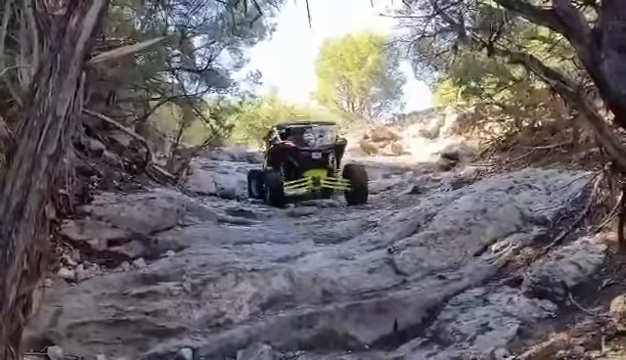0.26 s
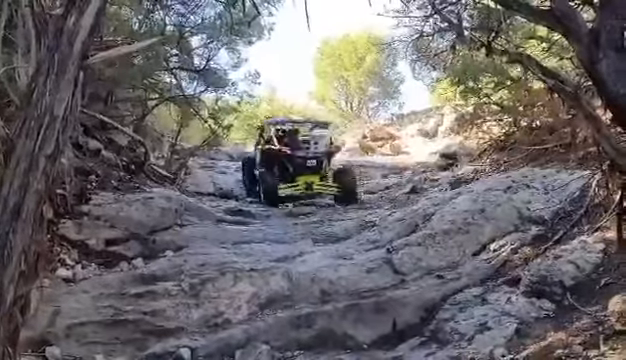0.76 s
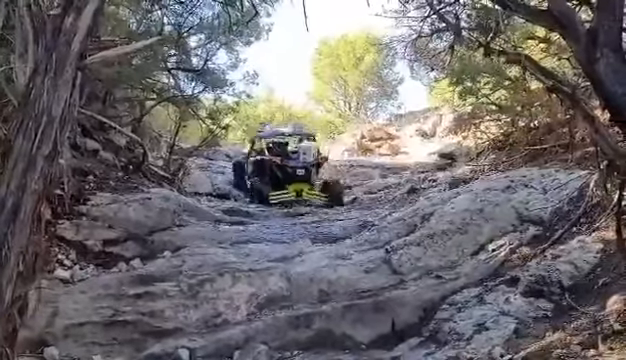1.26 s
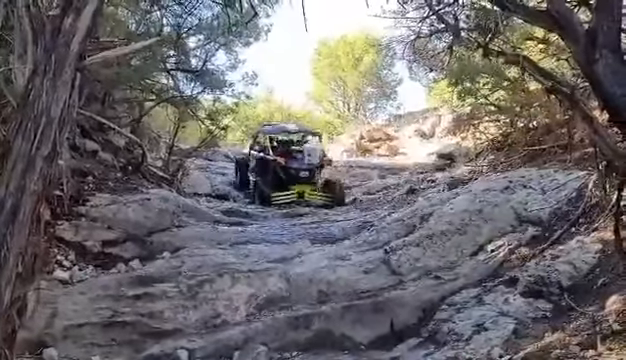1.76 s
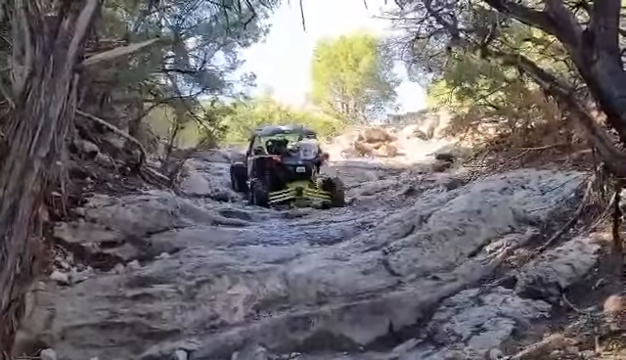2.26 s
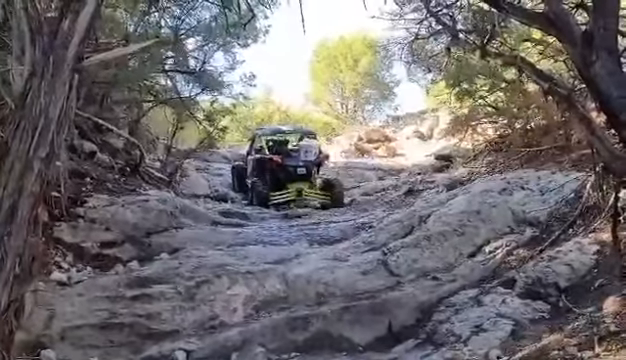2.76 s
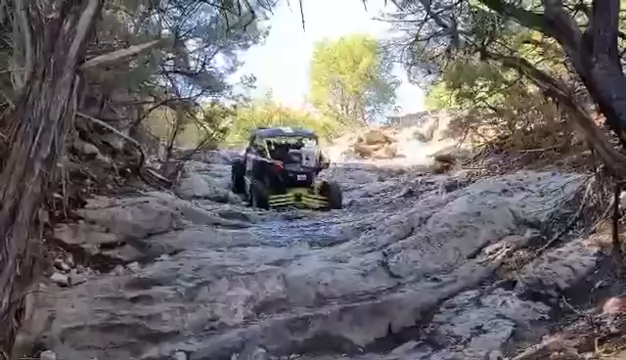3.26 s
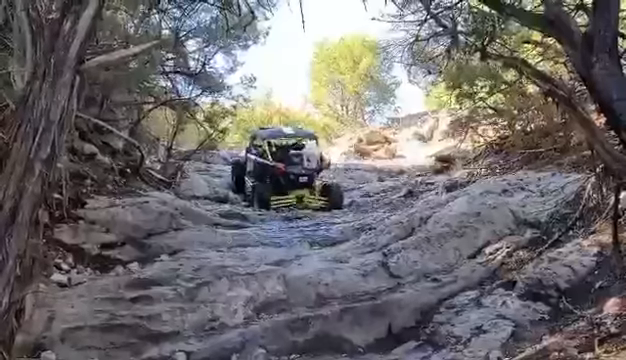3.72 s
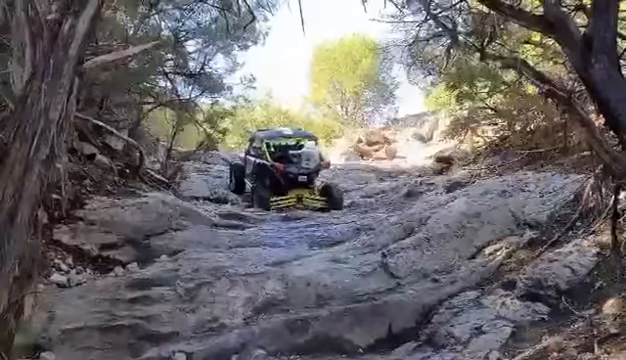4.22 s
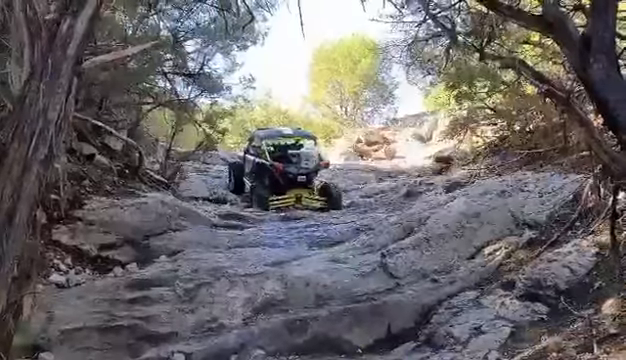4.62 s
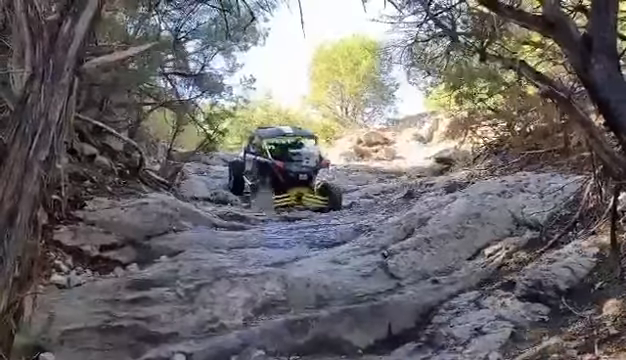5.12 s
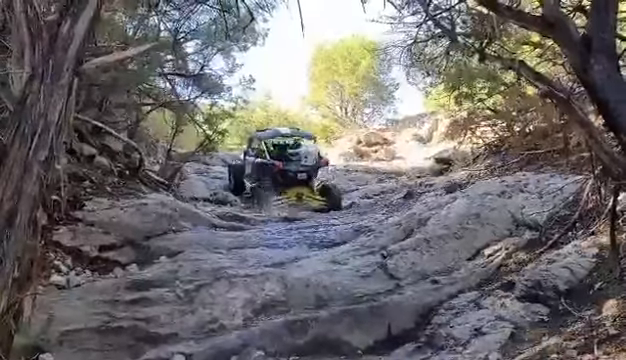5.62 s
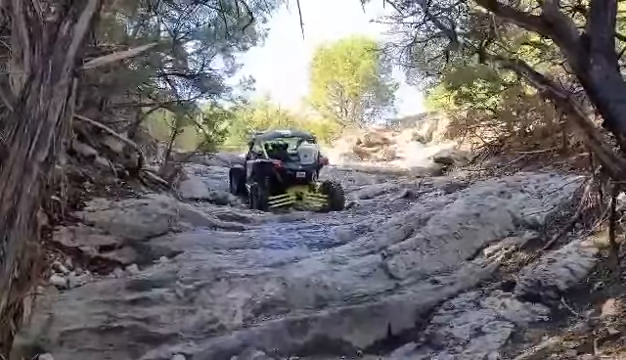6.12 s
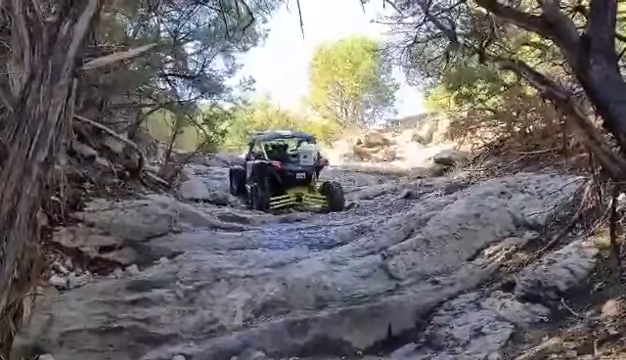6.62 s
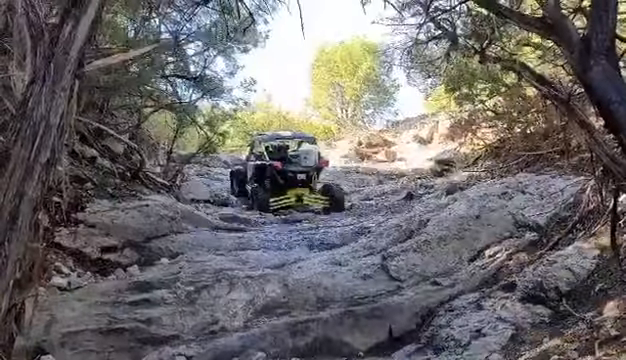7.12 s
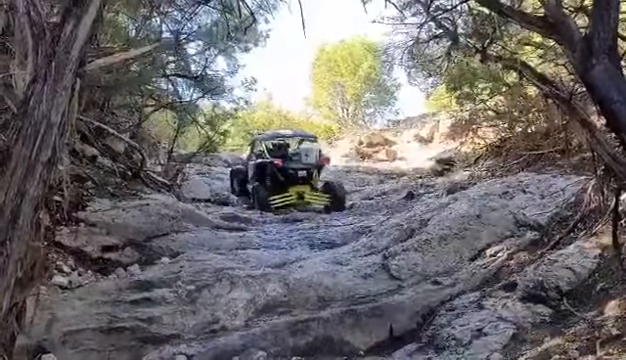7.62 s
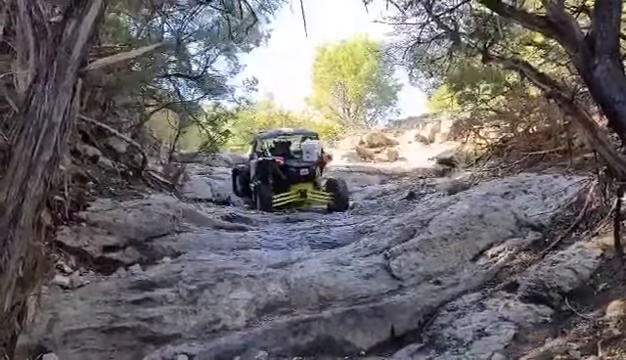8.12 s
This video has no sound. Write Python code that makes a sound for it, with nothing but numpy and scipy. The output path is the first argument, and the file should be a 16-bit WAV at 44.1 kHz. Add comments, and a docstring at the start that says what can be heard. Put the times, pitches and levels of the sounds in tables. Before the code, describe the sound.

An off-road buggy engine revs in uneven bursts with a raspy bark, air hissing, tyres scrubbing and knocking on rock, another engine idling.

```python
"""A buggy's engine revs in bursts as it climbs a rock ledge in a wood: tones at multiples of its firing rate,
with noise that swells at each firing and rings the tailpipe and silencer. Air whistles and hisses as the throttle
shuts, shaped from noise. A tyre scrubs (flickering noise) and squeals (wavering tones with rough rings).
Short rattles through ringing modes make chassis and stone knocks, a few misfires and a bark pulse.
A second engine idles steadily nearby. Rocks and trees scatter part of the sound to the sides."""
import sys
import numpy as np
from scipy import signal
from scipy.fft import rfft, irfft
from scipy.io import wavfile
from scipy.ndimage import uniform_filter1d

SR = 44100
rng = np.random.default_rng(int(sys.argv[2]) if len(sys.argv) > 2 else 0)


def master_out(mix):
    """Clip the mix to full scale and print it as 16-bit PCM to the path in sys.argv[1]."""
    frames = np.transpose(np.atleast_2d(mix))
    ceiling = np.clip(frames, -1, 1)
    pcm = np.round(ceiling * 32767).astype(np.int16)
    wavfile.write(sys.argv[1], SR, pcm)


N = 369553   # length in samples


def from_db(db):
    """Turn decibels into a gain."""
    return 10 ** (np.asarray(db) / 20)


def rms_one(x):
    """Scale a sound to an average strength (rms) of 1."""
    return x / np.sqrt(np.mean(x ** 2) + 1e-20)


def in_time(rows):
    """Draw straight lines between table rows: each column becomes a curve with one value a sample."""
    times, *columns = np.transpose(rows)
    return [np.interp(np.arange(N) / SR, times, column) for column in columns]


def brief(rows):
    """Draw a short curve of dB columns, all but silent (-99 dB) before and after."""
    silent = [-99] * (len(rows[0]) - 1)
    before = (rows[0][0] - .02, *silent)
    after = (rows[-1][0] + .02, *silent)
    return in_time([before] + rows + [after])


def bursts(rows):
    """Add up gains of events (start t/s, level/dB, t60/s, rise/s) that rise quickly and die away."""
    total = np.zeros(N)
    for start, db, t60, rise in rows:
        after = np.maximum(np.arange(N) / SR - start, 0)
        total += from_db(db - 60 * after / t60) * np.minimum(after / rise, 1)
    return total


def drift(rate_hz):
    """Wander at random with spread 1: noise smoothed twice, drawn at every 40th sample and joined up."""
    r = np.exp(-80 * np.pi * rate_hz / SR)
    noise = rng.standard_normal(N // 40 + 2002)
    slow = signal.lfilter([1], [1, -2 * r, r * r], noise)[2000:]   # drop the filter's start
    return np.interp(np.arange(N) / 40, np.arange(len(slow)), rms_one(slow))


def at_hz(points, hz=np.arange(1, N // 2 + 2) * SR / N):
    """Read a spectrum's level at given frequencies, or at every FFT bin."""
    table = np.array(points)
    return np.interp(np.log(hz), np.log(table[:, 0]), table[:, 1])


def coloured(noise, spectrum):
    """Shape noise with a spectrum; rms 1."""
    return rms_one(irfft(rfft(noise) * from_db(at_hz(spectrum)), N))


def resonance(x, hz, width_hz):
    """Ring at one frequency: a two-pole filter with a peak gain of about 1."""
    r = np.exp(-np.pi * width_hz / SR)
    top = np.array([1, 0, -1]) * (1 - r * r) / 2
    return signal.lfilter(top, [1, -2 * r * np.cos(2 * np.pi * hz / SR), r * r], x)


def hollow(x, peaks):
    """Ring several hollow resonances (f/Hz, width/Hz, level/dB) side by side; rms 1."""
    total = 0
    for hz, width_hz, db in peaks:
        once = resonance(x, hz, 1.5 * width_hz)   # two wider passes together give about the listed width
        total = total + from_db(db) * rms_one(resonance(once, hz, 1.5 * width_hz))
    return rms_one(total)


def orders(turns, levels, uneven_db, wander=0, breakup=0):
    """Add tones at multiples of the firing rate; each wavers in level and slips in phase, slowly and fast."""
    total = 0
    for k, db in levels:
        slow_slip = (k - 1) * wander * drift(3)
        fast_slip = breakup * drift(28)
        level = np.sqrt(2) * from_db(db + uneven_db * drift(7.2))
        total = total + level * np.cos(2 * np.pi * (k * turns + slow_slip + fast_slip))
    return total


def puffs(turns, depth, sharp):
    """Make noise that swells at each firing, every firing with its own strength."""
    strength = from_db(rng.normal(0, 5.6, int(turns[-1]) + 2))[turns.astype(int)]
    swell = strength * np.exp(-sharp * (turns % 1))
    return (1 - depth + depth * swell) * rng.standard_normal((2, N))


def gritty(spectrum, flicker_db, split_hz=6000):
    """Colour noise whose low and high grit flicker apart; rms 1."""
    noise = coloured(rng.standard_normal((2, N)), spectrum)
    low = signal.sosfilt(signal.butter(2, split_hz, fs=SR, output="sos"), noise)
    total = 0
    for part in (low, noise - low):
        total = total + from_db(flicker_db * (drift(38) + .5 * drift(8.5))) * part
    return rms_one(total)


# Speed of the climbing engine: t/s, firing rate f/Hz
SPEED = [(0.0, 83.3), (0.3, 86.2), (0.4, 89.9), (0.55, 100.0), (0.6, 97.8), (0.7, 87.2), (0.8, 79.9),
         (1.1, 69.8), (1.2, 68.7), (1.35, 64.0), (1.5, 65.0), (1.6, 62.6), (1.8, 52.8), (2.3, 41.4),
         (2.45, 39.5), (2.52, 41.5), (2.8, 69.0), (3.0, 72.0), (3.2, 80.9), (3.4, 86.7), (3.5, 87.3),
         (3.6, 92.6), (3.7, 94.3), (3.9, 67.9), (4.0, 64.2), (4.1, 67.9), (4.2, 75.7), (4.3, 80.8),
         (4.38, 81.5), (4.55, 81.1), (4.7, 88.7), (4.8, 100.3), (5.0, 113.8), (5.1, 126.5), (5.15, 129.6),
         (5.25, 121.5), (5.275, 108), (5.3, 86), (5.36, 79), (5.41, 71), (5.45, 60.9), (5.6, 61.3),
         (5.8, 53.5), (6.2, 44.1), (6.5, 39.2), (7.0, 37.0), (7.15, 39.7), (7.25, 53.7), (7.4, 64.3),
         (7.55, 66.8), (7.85, 62.0), (8.1, 68.7), (8.2, 69.1), (8.37, 66.4)]


def engine_speed(lag_s=0):
    """Give the engine's firings per second; a lag makes the same curve come later."""
    return in_time([(s + lag_s, hz) for s, hz in SPEED])[0]


# How hard the engine fires, about 0 under full pull: t/s, level/dB
LOAD = [(0, -9.5), (.2, 1.5), (.3, -4.5), (.5, -1), (.6, -8.5), (.8, -23), (1.0, -6), (1.1, -15), (1.6, -8),
        (1.8, -19), (1.9, -9.5), (2.1, -11), (2.4, -5), (2.5, -12.5), (2.7, -2), (3.0, -3), (3.2, 3.5),
        (3.5, -4.5), (3.8, -6.5), (3.85, -21), (4.05, -16.5), (4.2, 2), (4.55, -2.5), (4.7, 2), (4.8, -2),
        (5.0, 3), (5.15, -11.5), (5.27, 4), (5.295, -3.5), (5.325, -14), (5.36, 1.5), (5.41, -2.5),
        (5.44, -7.5), (5.5, -8), (5.7, -19), (6.0, -14.5), (6.3, -10.5), (6.4, -6.5), (6.5, -10), (6.7, -5),
        (6.9, -9), (7.1, -5.5), (7.2, -13.5), (7.3, 0.5), (7.5, -5), (7.8, -15), (8.1, -3), (8.25, -4.5),
        (8.3, -14)]


def engine_load():
    """Give the strength of firing over time."""
    return in_time(LOAD)[0]


# Levels that follow engine speed: firing rate f/Hz, roar level/dB, hiss level/dB, drone level/dB, snarl level/dB
BY_SPEED = [(41.4, -37.5, -57, -36, -80), (50.8, -34.5, -52.5, -33, -41.5),
            (66, -33.5, -49.5, -33.5, -40.5), (82.5, -33, -48.5, -36, -38),
            (92.2, -27.5, -43.5, -33.5, -32), (134, -24.5, -36.5, -26, -23)]


def by_speed(firing_hz):
    """Give the roar, hiss, drone and snarl levels that belong to an engine speed."""
    hz, *columns = np.transpose(BY_SPEED)
    return [np.interp(firing_hz, hz, column) for column in columns]


BREAKUP_HZ, BREAKUP_TURNS = 107, .1   # firing rate where raggedness begins; its full size in firing cycles


def raggedness(firing_hz):
    """Firing turns ragged at high revs: give the timing scatter in firing cycles."""
    return BREAKUP_TURNS * np.clip((firing_hz - BREAKUP_HZ) / 10, 0, 1)


# The two lowest orders under full pull, loudest near the silencer's ring: f/Hz, level/dB rms
FIRST_ORDER = [(38, -32), (50, -19.5), (60, -19.5), (70, -14), (80, -14), (88, -13.5), (100, -19.5),
               (114, -27), (130, -42)]
SECOND_ORDER = [(74, -15), (82, -12.5), (90, -16), (100, -20), (120, -37.5), (135, -26.5), (150, -31),
                (170, -27.5), (195, -23), (225, -26), (260, -26)]
# How the exhaust pipe colours the upper orders: f/Hz, level/dB
PIPE = [(110, 0), (160, -1), (200, 0), (235, 1), (252, -9), (270, 3.5), (300, -4), (340, 4), (368, -2),
        (400, 5), (450, -8.5), (510, -7.5), (545, -2.5), (580, -1), (625, -9.5), (700, -4), (1000, -61)]
# Swell of the orders from pull to pull: t/s, second order level/dB, upper orders level/dB
SWELL = [(0, 0.5, 1.5), (.25, 3.5, -2), (.5, 0.5, 0), (.7, 5, 1.5), (1.0, 0.5, -0.5), (1.4, -8.5, 1),
         (1.8, -2, -0.5), (2.2, -2.5, -0.5), (2.7, -1.5, 0.5), (3.0, 3, -0.5), (3.3, -2.5, 2.5),
         (3.6, -2, -1.5), (3.68, 3.5, -3), (3.78, 0.5, -0.5), (3.9, 2.5, 3), (4.15, -1.5, -2),
         (4.35, -3.5, 3.5), (4.6, -2.5, 2), (4.8, -2, 2), (4.95, -5, -3), (5.1, -2, 0), (5.25, -2.5, -3),
         (5.6, -2, 0), (6.2, -1, 0), (7.0, 2, -1), (7.3, -1, -0.5), (7.45, -2, -0.5), (7.6, 1.5, 3),
         (7.8, 3.5, 1.5), (7.95, -0.5, 0), (8.1, 1.5, 3.5), (8.2, 5, -1), (8.38, 0, 2.5)]
SECOND_FOLLOWS, DRONE_FOLLOWS, SNARL_FOLLOWS = 0.6, 0.18, 0.24   # share of the load's swing in dB
SNARL_HZ = 268   # orders pass from drone to snarl around here
ORDER_FALL_DB = -1.47   # each further upper order is weaker
STRAIN_DB, STRAIN_AT_PEAK_DB = 1.6, 3   # unevenness of the upper orders; what high revs add
OVERRUN_DB = -2.5   # fade of the upper orders per 100 firings per s lost in a second; the second fades half


def climbing_engine(firing_hz, load_db, drone_db, snarl_db):
    """Exhaust tone: the low orders boom in the silencer, the upper ones swell as they cross pipe resonances."""
    turns = np.cumsum(firing_hz) / SR   # firings so far
    slowing = np.maximum(-uniform_filter1d(np.gradient(firing_hz) * SR, size=2000), 0)   # firings per s, per s
    overrun_db = OVERRUN_DB * slowing / 100
    second_swell_db, upper_swell_db = in_time(SWELL)
    first_db = load_db + at_hz(FIRST_ORDER, firing_hz)
    second_db = SECOND_FOLLOWS * load_db + at_hz(SECOND_ORDER, 2 * firing_hz)
    second_db = second_db + overrun_db / 2 + second_swell_db
    drone_db = drone_db + DRONE_FOLLOWS * load_db + overrun_db + upper_swell_db
    snarl_db = snarl_db + SNARL_FOLLOWS * load_db + overrun_db + upper_swell_db
    upper = []
    for k in range(3, 10):
        snarling = np.clip((k * firing_hz / SNARL_HZ - 1) * 10 + .5, 0, 1)
        base_db = drone_db + snarling * (snarl_db - drone_db)
        upper.append((k, base_db + ORDER_FALL_DB * (k - 3) + at_hz(PIPE, k * firing_hz)))
    strain_db = STRAIN_DB + STRAIN_AT_PEAK_DB * np.clip((firing_hz - 90) / 35, 0, 1)
    breakup = raggedness(firing_hz)
    low_tone = orders(turns, [(1, first_db), (2, second_db)], uneven_db=1.24, wander=.04, breakup=breakup)
    return low_tone + orders(turns, upper, strain_db, wander=.04, breakup=breakup)


# Colour of the roar: f/Hz, relative level/dB per Hz
ROAR = [(25, 6.5), (55, 9), (85, 12), (150, -1), (300, -1.5), (430, -3), (540, 0.5), (700, -3),
        (850, -10.5), (1100, -4.5), (1500, -11), (2000, -15.5), (2400, -25.5), (3200, -18.5),
        (12000, -79.5)]
# Tailpipe rings, close neighbours of the main one, and a coarse ring at full revs: f/Hz, width/Hz, level/dB
BARK = [(1070, 55, 0), (1540, 70, -13), (2015, 70, -14)]
BARK_UPPER = [(1145, 65, -3), (1205, 65, -8)]
RASP = [(1540, 220, 0), (1950, 240, -2)]
# Loudness of the tailpipe bark: t/s, level/dB
BARK_LEVEL = [(0, -40), (.085, -42), (.11, -34.5), (.195, -41), (.24, -35.5), (.33, -38.5), (.45, -34),
              (.6, -34.5), (.7, -43), (1.0, -46.5), (1.6, -58), (2.5, -55), (2.7, -45), (3.0, -45),
              (3.6, -48), (3.72, -47), (4.0, -66), (4.2, -53), (4.65, -50), (4.9, -42), (5.03, -35.5),
              (5.07, -40), (5.12, -34), (5.18, -34.5), (5.22, -25.5), (5.26, -35), (5.3, -51), (5.6, -46),
              (6.4, -56), (7.2, -50), (7.25, -43.5), (7.39, -43), (7.43, -47.5), (7.75, -49), (7.94, -53),
              (8.0, -40.5), (8.11, -41), (8.14, -41), (8.22, -39.5), (8.25, -49), (8.38, -49)]
# How the ring leans from the tailpipe rings to the neighbours: t/s, neighbours' level/dB
BARK_LEAN = [(0, -1), (.3, -2), (.45, -6), (.6, -8), (.75, -2), (1.5, 0), (3.4, 2), (4.4, -3), (4.9, -2),
             (5.07, 6), (5.25, 4), (6.5, 0), (7.35, 3), (7.7, -4), (8.1, -7), (8.38, -6)]
ROAR_FOLLOWS = 0.02   # share of the load's swing in dB
STEP_DB, RASP_DB = 11, -9   # pressure steps before their lean, against puffs; full rasp against bark


def exhaust_noise(firing_hz, load_db, roar_db):
    """Gas rushing out at each firing: broad roar, and a bark where pressure steps and puffs ring the tailpipe."""
    turns = np.cumsum(firing_hz) / SR
    ragged = raggedness(firing_hz)
    roar = coloured(puffs(turns, depth=.22, sharp=2.5), ROAR)
    uneven_turns = np.maximum.accumulate(turns + (.012 + .15 * ragged) * drift(40))   # never runs backwards
    firings = np.diff(np.floor(uneven_turns), prepend=0)   # a click at each firing
    steps = from_db(STEP_DB) * rms_one(firings * from_db(2.5 * drift(25)))
    steps = steps * [[1.3], [-.3]]   # an inverted copy in the side part leans the steps to the right
    drive = steps + rms_one(puffs(turns, depth=0.5, sharp=3.5))
    upper = from_db(in_time(BARK_LEAN)[0])
    bark = (hollow(drive, BARK) + upper * hollow(drive, BARK_UPPER)) / np.sqrt(1 + upper ** 2)
    rasp = hollow(drive * from_db(3 * drift(80)), RASP)
    rasp = from_db(RASP_DB) * ragged / BREAKUP_TURNS * rasp
    bark_gain = from_db(in_time(BARK_LEVEL)[0])
    return from_db(roar_db + ROAR_FOLLOWS * load_db) * roar + bark_gain * (bark + rasp)


# Low ring at full revs: t/s, level/dB
BOOM = [(4.98, -42), (5.008, -24.5), (5.114, -45), (5.16, -18), (5.184, -22), (5.208, -39), (5.255, -16),
        (5.275, -37)]
# The silencer's resonance: f/Hz, width/Hz, level/dB
SILENCER = [(87, 17, 0)]


def boom():
    """Uneven firing rings the silencer at full revs: a lumpy low note made from narrow noise."""
    return from_db(brief(BOOM)[0]) * hollow(rng.standard_normal((2, N)), SILENCER)


# Air let go as the throttle shuts: t/s, whistle level/dB, hiss level/dB, whistle t60/s
BLOW_OFF = [(.59, -41.5, -41, 1.5), (3.72, -42, -39, 2.0), (5.21, -43, -36, 1.4), (5.48, -55, -45, 2.2)]
# The valve's hollow whistle: f/Hz, width/Hz, level/dB
VALVE = [(2960, 120, -4), (3130, 100, -3), (3415, 95, 1)]


def blow_off():
    """Boost air escapes at once and whistles in the valve, dying away as the pressure falls."""
    level = bursts([(s, whistle_db, t60, 0.0097) for s, whistle_db, _, t60 in BLOW_OFF])
    return level * from_db(2.5 * drift(30)) * hollow(rng.standard_normal((2, N)), VALVE)


# Colour of the valve air: f/Hz, relative level/dB per Hz
HISS = [(900, -35.5), (1500, 4), (2600, -5), (4100, -6), (6300, -11.5), (8000, -17.5), (12000, -16)]
# Short tyre slips: t/s, level/dB rms before the decay, t60/s, rise/s
SCUFFS = [(2.98, -46, 0.64, 0.03), (4.78, -66, 0.3, .02), (5.17, -27, 1, 0.051), (5.86, -38, 0.36, 0.015),
          (6.06, -42.5, 0.25, 0.022), (6.73, -47, 0.63, 0.0084)]
HISS_RISE_S, HISS_OUTLASTS = 0.0046, 1.26   # rise of the valve hiss; its t60 against the whistle's


def hiss(hiss_db):
    """Intake air, valve air and short tyre slips share one broad hiss, their powers added."""
    valve = bursts([(s, db, HISS_OUTLASTS * t60, HISS_RISE_S) for s, _, db, t60 in BLOW_OFF])
    level = np.sqrt(from_db(hiss_db) ** 2 + valve ** 2 + bursts(SCUFFS) ** 2)
    return level * gritty(HISS, flicker_db=1.33)


# Colour of a tyre sliding on rock: f/Hz, relative level/dB per Hz
SCRUB = [(1200, -23), (2200, -11.5), (3140, -3.5), (4700, -6.5), (6000, -6), (10900, -18.5), (12200, -29.5)]
# One long tyre slide: t/s, level/dB rms
SLIDE = [(1.2, -49), (1.272, -53), (1.298, -41), (1.526, -41), (1.554, -42.5), (1.788, -40.5), (1.93, -64)]


def tyre_slide():
    """A tyre scrubs over rock: gritty noise that flickers."""
    return from_db(brief(SLIDE)[0]) * gritty(SCRUB, flicker_db=1.2)


# Loudness of the squeal: t/s, first partial level/dB, second partial level/dB
SQUEAL = [(5.16, -54, -72), (5.178, -52, -80), (5.228, -44, -44), (5.272, -37, -38), (5.308, -53, -43),
          (5.4, -58, -61)]
SQUEAL_HZ = 3979   # first partial
SQUEAL_CLEAR = .9   # gain of the wavering pure tones


def squeal():
    """Rubber sticks and slips on the rock: two wavering partials with rough rings around them."""
    first_db, second_db = brief(SQUEAL)
    slip = rng.standard_normal((2, N))
    turns = SQUEAL_HZ * np.arange(N) / SR + .12 * drift(12) * [[1], [1]] + [[0], [.2]]   # side part shifted
    tone = []
    for k in (1, 2):
        level = SQUEAL_CLEAR * np.sqrt(2) * from_db(2.5 * drift(40))
        tone.append(level * np.cos(2 * np.pi * k * turns))
    low = hollow(slip, [(1.032 * SQUEAL_HZ, 60, -2), (3350, 90, 0), (4600, 70, -3), (2950, 90, -1)])
    high = hollow(slip, [(2 * SQUEAL_HZ, 90, 0), (8570, 60, -2), (9100, 120, -5)])
    return from_db(first_db) * (tone[0] + low) + from_db(second_db) * (tone[1] + .6 * high)


# Knocks of chassis and stones, misfire bursts near 5 s, a bark pulse at 8.16 s:
# t/s, direct peak level/dB, favoured f/Hz, narrowing dB/octave, rattle decay to 1/e in s
KNOCKS = [(1.176, -30, 1800, 5, .01), (1.409, -29, 3000, 3, .008), (1.961, -35, 2500, 3, .015),
          (2.138, -30, 1500, 7, .008), (2.163, -30, 1130, 20, .003), (3.006, -26, 3600, 5, .02),
          (5.919, -33, 2900, 3, .012), (3.446, -16, 1130, 30, .002), (3.457, -23, 720, 30, .003),
          (3.482, -18, 580, 30, .007), (4.672, -23, 1130, 30, .002), (5.794, -30, 1130, 30, .003),
          (6.074, -28, 2200, 3, .016), (6.085, -23, 1500, 2, .008), (6.195, -33, 2000, 0, .025),
          (6.742, -29, 1700, 2, .026), (6.746, -28, 1400, 4, .01), (7.935, -32, 1850, 20, .02),
          (4.96, -20, 400, 8, .02), (5.023, -17, 400, 10, .01), (5.048, -15, 400, 8, .02),
          (5.153, -18, 580, 6, .015), (1.031, -34, 2900, 3, .012), (1.83, -35, 3000, 3, .01),
          (5.422, -30, 3000, 3, .012), (8.158, -25, 1130, 30, .002)]
# Ringing modes that all these share: f/Hz, level/dB, t60/s
CHASSIS = [(300, -2, .05), (400, 0, .06), (580, 0, .09), (720, -2, .05), (1130, 0, .035), (1400, -2, .04),
           (1850, -2, .02), (2950, -7, .012), (3500, -10, .01), (4500, -15, .005)]


def knocks_and_misfires():
    """Each event is a sharp start and a short rattle that ring the modes near its favoured frequency most."""
    out, after = np.zeros((2, N)), np.arange(SR // 5) / SR
    for s, peak_db, near_hz, narrow_db, rattle_s in KNOCKS:
        rattle = rng.standard_normal((2, len(after))) ** 3 / 4   # cubing makes it spiky
        rattle *= np.exp(-after / rattle_s) * np.minimum(3 * after / rattle_s, 1)
        rattle[:, 0] = (.014 / rattle_s) ** 1.6   # short events start hardest
        low_pass = signal.butter(3, 1.6 * near_hz, fs=SR, output="sos")
        soft = signal.sosfilt(low_pass, rattle)   # softens the start, as when rubber meets rock
        rung = 0
        for hz, db, t60 in CHASSIS:
            mode = rms_one(resonance(soft, hz, np.log(1000) / np.pi / t60))
            rung = rung + from_db(db - narrow_db * abs(np.log2(hz / near_hz))) * mode
        event = from_db(peak_db) * rung / np.abs(rung[0]).max() * [[1], [.3]]   # less is scattered
        at = round(s * SR)
        out[:, at:at + len(after)] += event[:, :N - at]
    return out


# Tones of the idling engine: multiple of its firing rate, level/dB rms
IDLE = [(1, -43.5), (1.5, -52), (2, -29.5), (2.5, -64), (3, -38), (4, -45.5), (5, -51.5)]
IDLE_HZ = 36.81   # average firing rate


def idling_engine():
    """A second engine holds a steady drone whose speed hunts a little."""
    firing_hz = IDLE_HZ * (1 + 0.00756 * drift(0.555))
    return orders(np.cumsum(firing_hz) / SR, IDLE, uneven_db=1.5)


# Scattered side sound against the middle, before both are leaned: f/Hz, level/dB
SIDE_DB = [(60, -27), (110, -27), (190, -26), (350, -16), (620, -15), (1120, -7), (2010, -5), (3610, -4),
           (6480, 0), (11000, 0), (11800, -9)]
# Gain of the left channel against the right: f/Hz, level/dB
LEAN_DB = [(60, -0.5), (110, -0.5), (190, -0.5), (350, 0.0), (620, -0.5), (1120, -3.0), (2010, -1.5),
           (3610, 0.5), (6480, -0.5), (11600, 0.5)]
GAS_LAG_S = 0.05   # roar and hiss, drone and snarl levels trail the revs


def scene():
    """Noisy sources carry a direct and a scattered part, mostly unrelated; firing steps and squeal tones share."""
    firing_hz, load_db = engine_speed(), engine_load()
    roar_db, hiss_db, drone_db, snarl_db = by_speed(engine_speed(GAS_LAG_S))
    tones = climbing_engine(firing_hz, load_db, drone_db, snarl_db) + idling_engine()
    noises = exhaust_noise(firing_hz, load_db, roar_db) + boom() + blow_off()
    noises = noises + hiss(hiss_db) + tyre_slide() + squeal() + knocks_and_misfires()
    direct, scattered = noises
    late = .8 * drift(3) * np.roll(tones, round(.021 * SR))   # echoes of the tones shift from side to side
    mid = rfft(direct + tones)
    side = rfft(scattered + late) * from_db(at_hz(SIDE_DB))
    lean = from_db(at_hz(LEAN_DB) / 2)   # half on each channel
    return np.array([irfft((mid + side) * lean, N), irfft((mid - side) / lean, N)])


def record(dry):
    """Cut the top steeply: from 12200 Hz up it is at least 45 dB down."""
    return signal.sosfilt(signal.cheby2(14, 45, 12200, fs=SR, output="sos"), dry)


dry = scene()
out = record(dry)
master_out(out)
```